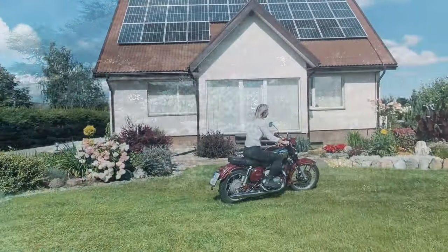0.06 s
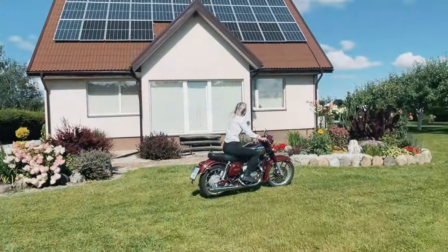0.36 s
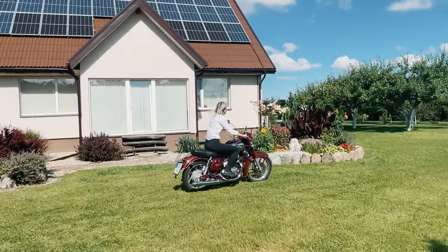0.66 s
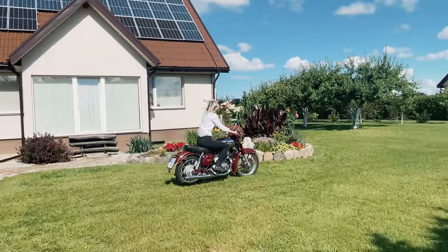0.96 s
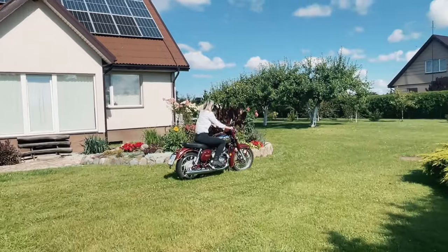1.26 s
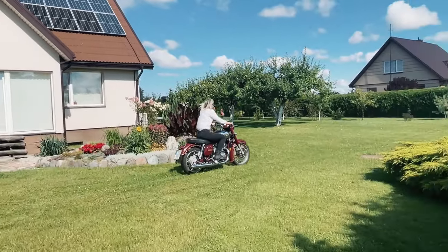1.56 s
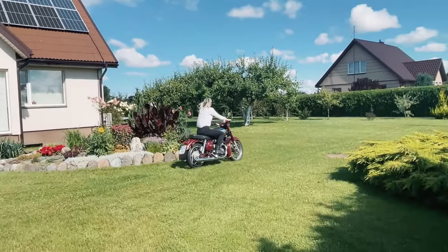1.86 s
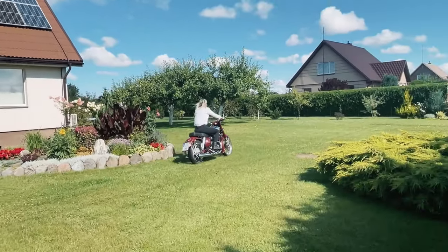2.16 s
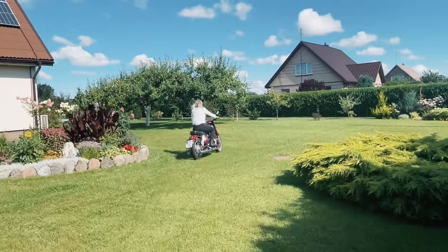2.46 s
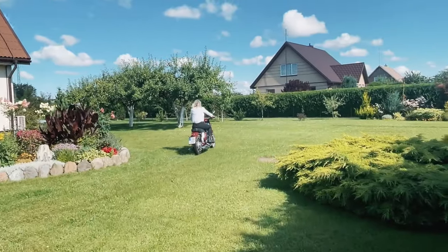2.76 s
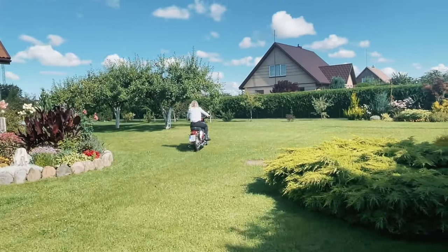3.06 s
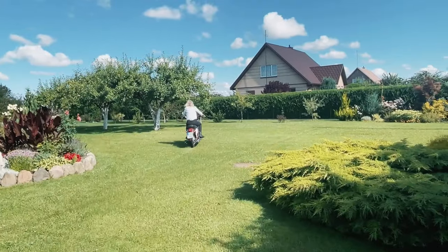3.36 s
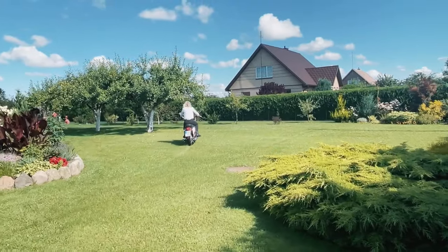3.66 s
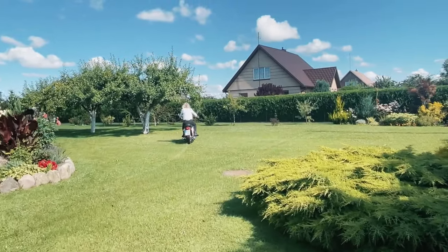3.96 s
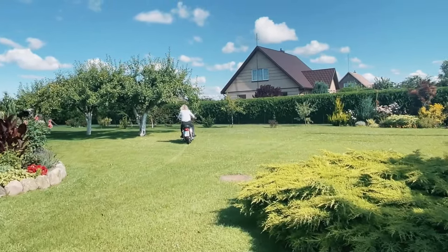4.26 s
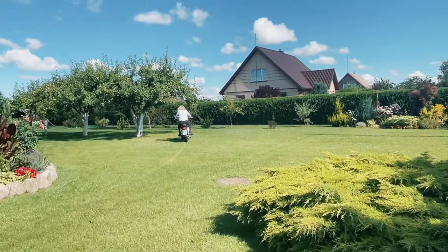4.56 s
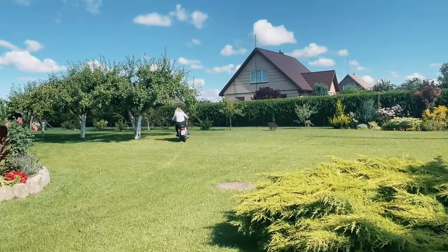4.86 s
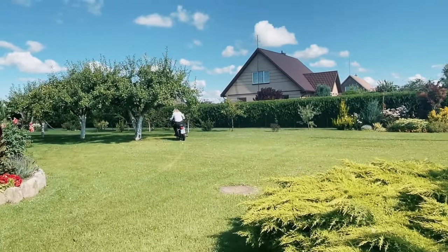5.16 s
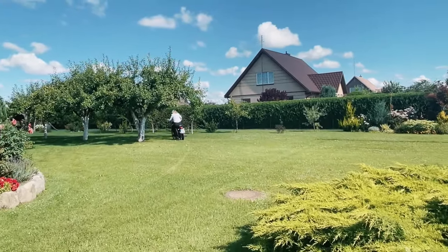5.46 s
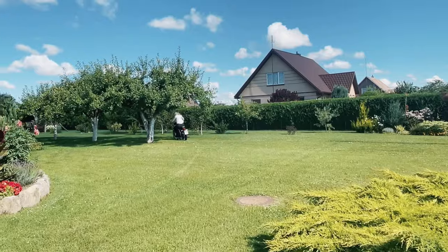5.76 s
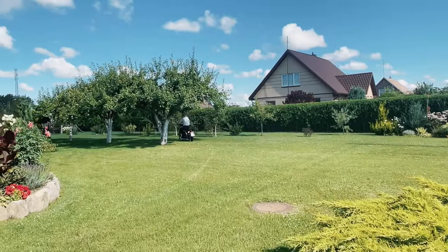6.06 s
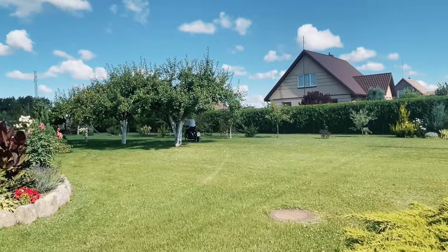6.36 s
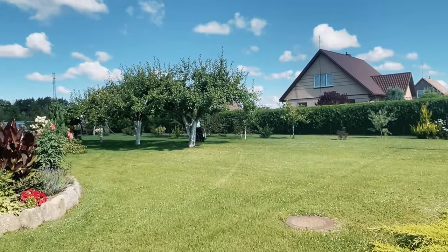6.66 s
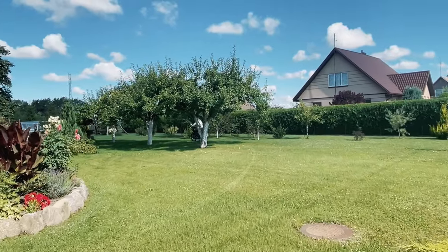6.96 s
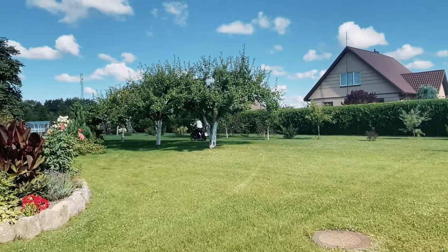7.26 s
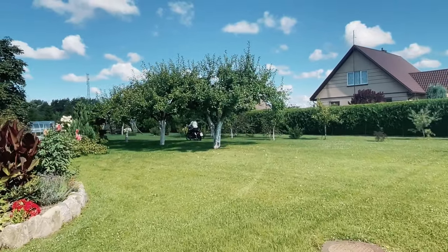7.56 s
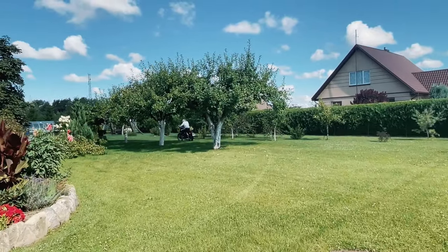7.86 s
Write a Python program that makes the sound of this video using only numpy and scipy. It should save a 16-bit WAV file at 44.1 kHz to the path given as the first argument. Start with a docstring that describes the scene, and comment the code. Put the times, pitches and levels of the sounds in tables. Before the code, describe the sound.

A single-cylinder motorcycle chugs across an open lawn at low revs, each beat a deep boom with a metallic rattle and a puff of hiss. It gently picks up pace as it moves away from the microphone and grows fainter. From about halfway, gusts of wind rumble and thump right on the microphone. Near the end the throttle shuts in the distance, and the gears whine faintly as the revs sink.

```python
"""A single-cylinder motorcycle chugs away from the microphone across a lawn, at low revs.
Every firing booms in the silencer, rattles the engine's metal and lets out a puff of gas.
Far off, near the end, the throttle shuts and the gears whine faintly as the revs sink.
As the bike recedes, gusts of wind buffet the microphone and single eddies thump it."""
import sys
import numpy as np
from scipy import signal
from scipy.fft import rfft, irfft
from scipy.io import wavfile
from scipy.ndimage import uniform_filter1d

SR = 44100
rng = np.random.default_rng(int(sys.argv[2]) if len(sys.argv) > 2 else 0)


def generate_wav(signal):
    """Clip the signal to [-1, 1] and save it as 16-bit WAV at the path in sys.argv[1]."""
    frames = np.transpose(np.atleast_2d(signal))
    scaled = np.clip(frames, -1, 1) * 32767
    pcm = np.round(scaled).astype(np.int16)
    wavfile.write(sys.argv[1], SR, pcm)


N = 348378
TIME = np.arange(N) / SR


# The engine's pace as the bike crosses the lawn: time_s, firing_hz
REVS = [(0.0, 16.17), (0.23, 17.0), (0.5, 17.28), (1.19, 19.23), (1.25, 19.95), (1.85, 21.6), (2.19, 23.63),
        (2.67, 24.09), (3.44, 22.59), (3.78, 21.58), (4.61, 22.65), (5.37, 23.13), (6.0, 25.52),
        (6.45, 24.88), (7.08, 27.24), (7.53, 17.43), (7.9, 17.96)]
# Engine noise from where the microphone stands: time_s, clatter_db, hiss_db
ENGINE_LEVELS = [(0, -33, -46), (.75, -30.5, -42), (1.5, -31.5, -43.5), (2.3, -32, -42.7),
                 (3.05, -33.5, -45.5), (3.22, -36.5, -50.5), (3.65, -36, -48), (4.5, -40.5, -50.5),
                 (5.1, -39, -51), (5.35, -36, -44.5), (5.75, -34.5, -41.5), (6.5, -35, -42.5),
                 (6.85, -40, -46.5), (7.35, -41, -48.5), (7.66, -48, -62), (7.85, -43.5, -52)]
def motorcycle():
    """The crank drives every engine sound, with one firing a turn."""
    firing_hz, = curves(REVS)
    turns = np.cumsum(firing_hz) / SR
    clatter_db, hiss_db = curves(ENGINE_LEVELS)
    return (exhaust(turns, firing_hz) + metal(turns, firing_hz, clatter_db)
            + gas(turns, hiss_db) + gears(turns, clatter_db))


# The silencer's tone, heard across the grass: frequency_hz, gain_db
SILENCER_SPECTRUM = [(18, -13), (34, -46.5), (43, 1.5), (53, -36.5), (68, 5.5), (85, 4), (108, 0.5),
                     (135, -7.5), (190, -11.5), (228, -32.5), (268, -20), (350, -38), (600, -64.5),
                     (1500, -100)]
# The boom at the microphone, fading with distance: time_s, level_db
BOOM_LEVELS = [(0, -9.5), (.9, -8.5), (1.8, -9.5), (2.1, -11.5), (2.5, -10), (2.85, -14), (3.8, -13),
               (4.9, -15), (5.15, -21.5), (5.5, -14.5), (5.9, -26), (7.9, -33.5)]
def exhaust(turns, firing_hz, idle_hz=15.99, heat=.34, wander=.016, scatter_db=.5, delay_s=.0017):
    """Each firing booms in the silencer; hotter gas at higher revs raises its pitch."""
    boom = -response(SILENCER_SPECTRUM)
    # the chambers hold back the low notes, so each boom sweeps downward
    boom = boom - 2 * resonate(boom, hz=105, width_hz=120)
    age, out = np.arange(len(boom)), np.zeros(N)
    for i in np.searchsorted(turns, np.arange(int(turns[-1]) + 1)):
        pitch_ratio = (firing_hz[i] / idle_hz) ** heat * (1 + wander * rng.standard_normal())
        stretched = np.interp(age * pitch_ratio, age, boom, right=0)
        add(out, i / SR + delay_s, stretched * undb(scatter_db * rng.standard_normal()))
    return steady(out, size=8000) * undb(curves(BOOM_LEVELS)[0])


# The tone of the engine's rattle in the open air: frequency_hz, gain_db
CLATTER_SPECTRUM = [(200, 1), (450, -9.5), (650, -9.5), (900, -7), (1150, -8), (1500, -0.5), (1950, -1.5),
                    (2600, 0), (3600, -0.5), (4300, -11), (5200, -11), (7000, -16), (12000, -34.5)]
# Weaker modes of the fins and covers: pitch_hz, width_hz, gain_db
FIN_MODES = [(1066, 50, 0), (1165, 33, 0.5), (1407, 12, 7), (2253, 16.4, 9.5), (2476, 200, -1),
             (2644, 21, 9), (3205, 49, 7), (3258, 66, 3.5), (3566, 110, -7.5), (3697, 45, -10),
             (4190, 53, 3.5)]
# Each ring of the case swells once, as its side turns to the microphone:
# pitch_hz, width_hz, turned_away_re_clatter_db, peak_s, half_length_s, swell_db, knock_gain
CASE_RINGS = [(801, 62, -19, 0.012, .4, 12, 0.18), (1114, 420, -19.5, 0.045, 1.55, 16.5, 0.27),
              (1322, 130, -11.5, 1.44, 0.75, 10, 0.58), (1565, 41, -19.5, 3.15, 3.2, 13.5, 0.34),
              (1700, 61, -17.5, 6.21, 0.88, 18.5, 0.92), (2782, 58, -13, 1.8, 0.9, 7, 0.42),
              (3904, 72, -14, 3.87, 0.87, 7.5, .3), (4110, 480, -19, 2.2, 0.23, 12, 0.26)]
def metal(turns, firing_hz, clatter_db, idle_hz=16):
    """Impacts clatter in the engine and ring its fins and case, pulsing more distinctly at low revs."""
    slack = (idle_hz / firing_hz) ** 4
    slap, fire = .82 * slack, .2 * slack
    rattle = impacts(turns, bed=.63, slap=slap, fire=fire, grain_db=1.2)
    out = undb(-.6) * unit(colour(rattle, CLATTER_SPECTRUM))
    fin_blows = impacts(turns, bed=.63, slap=slap, fire=fire, grain_db=.9)
    fins = sum(undb(db) * resonate(resonate(fin_blows, hz, width_hz), hz, 6 * width_hz)
               for hz, width_hz, db in FIN_MODES)
    out += undb(-6.5) * unit(fins)
    case_blows = impacts(turns, bed=.45, slap=slap, fire=.15, grain_db=.8)
    knock = piston_knock(turns)
    for hz, width_hz, db, peak_s, half_length_s, swell_db, knock_gain in CASE_RINGS:
        ring = resonate(resonate(case_blows + knock_gain * knock, hz, width_hz), hz, 3 * width_hz)
        facing = np.exp(-((TIME - peak_s) / half_length_s) ** 2)
        out += steady(ring, size=6000) * undb(db + swell_db * facing)
    return out * undb(clatter_db)


def impacts(turns, bed, slap, fire, grain_db):
    """Dense small impacts, strongest as the piston slaps over and as the charge fires."""
    slapping = burst(turns, at=.86, rise=.05, fall=.15, scatter_db=1.8)
    firing = burst(turns, at=.02, rise=.04, fall=.25, scatter_db=1.5)
    force = (bed + slap * slapping + fire * firing) * grains(grain_db, size=40)
    return steady(force * rng.standard_normal(N), size=8000)


def piston_knock(turns, at=.88, jitter_turns=.012, scatter_db=.9):
    """One firm knock of the piston in every turn."""
    count = int(turns[-1])
    timing, strength = rng.standard_normal((count, 2)).T
    hits = np.searchsorted(turns, np.arange(count) + at + jitter_turns * timing)
    out = np.zeros(N + 1)
    out[hits] = undb(scatter_db * strength)
    return unit(out[:N])


# The tailpipe's hiss as it reaches the microphone: frequency_hz, gain_db
HISS_SPECTRUM = [(2000, -23.5), (4500, 9.5), (6000, -0.5), (7200, 2), (8200, 0.5), (9300, 1.5), (10200, 7),
                 (11000, 3.5), (12000, -8), (13000, -49)]
def gas(turns, hiss_db, bed=.46):
    """A sharp puff of hiss as the exhaust port opens."""
    puff = bed + burst(turns, at=.025, rise=.035, fall=.1, scatter_db=2.5)
    return unit(colour(puff * rng.standard_normal(N), HISS_SPECTRUM)) * undb(hiss_db + .53)


def gears(turns, clatter_db, teeth=64, waver_hz=70, whine_db=-4, shut_s=7.3, closing_s=.1):
    """When the throttle shuts, the gears whine roughly at the tooth rate and its octave."""
    braking = np.clip((TIME - shut_s) / closing_s, 0, 1)
    out = np.zeros(N)
    for harmonic, db in ((1, -9), (2, -3)):
        waver = butter(rng.standard_normal(N) + 1j * rng.standard_normal(N), 2, waver_hz)
        tooth_tone = np.exp(2j * np.pi * teeth * harmonic * turns)
        out += undb(db) * unit(np.real(waver * tooth_tone))
    return out * undb(clatter_db + whine_db) * braking


# Single eddies right on the microphone: start_s, peak_db, upper_edge_hz
EDDIES = [(3.148, -7, 115), (3.325, -11.5, 354), (3.455, -11, 120), (4.204, -3.5, 109), (4.362, -31, 300),
          (4.398, -19, 397), (4.412, -1, 245), (4.563, -8, 337), (4.652, -2.5, 283), (4.8, -10, 197),
          (4.981, -5, 130), (5.661, -12.5, 376), (5.983, -14, 346), (6.286, -16, 420), (6.496, -13.5, 544),
          (6.599, -16, 400), (6.681, -3, 232), (6.81, -14, 484), (6.881, -6.5, 282), (6.913, -4, 640),
          (7.066, -8.5, 450), (7.096, -9, 616), (7.486, -4.5, 670), (7.665, -9, 465), (7.696, -11.5, 630),
          (7.716, -12, 427), (7.777, -17, 710), (7.811, -13, 398)]
def eddy_thumps(bass_cut_hz=68):
    """Each eddy is a rounded pressure step; the microphone's bass cut makes it swing and sink in pitch."""
    out = np.zeros(N)
    swing = butter(np.ones(6000), 5, bass_cut_hz, "high")
    for start_s, peak_db, upper_edge_hz in EDDIES:
        thump = butter(swing, 4, upper_edge_hz)
        add(out, start_s, -undb(peak_db) * thump / np.abs(thump).max())
    return out


# The breeze at the microphone between gusts: time_s, level_db
BREEZE_LEVELS = [(0, -23.5), (2.2, -26.5), (3.1, -20.5), (4.1, -26.5), (5.1, -27), (5.85, -26.5),
                 (6.3, -22.5), (7.9, -22.5)]
# Gusts off the lawn that hit the microphone: start_s, length_s, level_db
WIND_GUSTS = [(3.076, 0.36, -22), (4.14, 0.087, -19.5), (4.371, 0.035, -13), (4.578, 0.071, -14.5),
              (4.797, 0.17, -17), (5.406, .23, -20), (6.105, .06, -19), (6.29, 0.13, -19),
              (6.564, 0.33, -15.5), (6.975, .18, -14.5), (7.286, 0.026, -15), (7.363, 0.15, -16.5),
              (7.59, 0.19, -14)]
# The rumble of air on the microphone itself: frequency_hz, gain_db
BUFFET_SPECTRUM = [(18, -6), (32, -21), (45, -2.5), (70, 1.5), (105, -5.5), (150, -10), (220, -16),
                   (330, -23.5), (500, -33.5), (800, -50), (2000, -100)]
def wind(lumpy_db=5, attack_s=.043, release_s=.11):
    """Lumpy turbulence on the microphone; each gust rises out of the breeze, holds and drops back."""
    lumps = uniform_filter1d(grains(lumpy_db, size=300), 150)
    rumble = colour(lumps * rng.standard_normal(N), BUFFET_SPECTRUM)
    strength = undb(curves(BREEZE_LEVELS)[0])
    for start_s, length_s, level_db in WIND_GUSTS:
        corners = [start_s - attack_s, start_s, start_s + length_s, start_s + length_s + release_s]
        strength = np.maximum(strength, undb(level_db) * np.interp(TIME, corners, [0, 1, 1, 0]))
    return steady(rumble, size=2600) * strength


def burst(turns, at, rise, fall, scatter_db):
    """An envelope with one peak of random strength a turn; at, rise and fall are in turns."""
    since = (turns - at) % 1
    nearest_peak = np.round(turns - at).astype(int) + 2
    strength = undb(scatter_db * rng.standard_normal(400))[nearest_peak]
    return strength * (np.exp(-since / fall) + np.exp((since - 1) / rise))


def grains(scatter_db, size):
    """Random gains, each held for size samples."""
    return np.repeat(undb(scatter_db * rng.standard_normal(N // size + 1)), size)[:N]


def undb(db):
    """Decibels to gain."""
    return 10 ** (np.asarray(db) / 20)


def unit(x):
    """Scale to rms 1."""
    return x / np.sqrt(np.mean(x ** 2))


def curves(table):
    """Each column of a table, joined by straight lines in time."""
    time_s, *columns = np.transpose(table)
    return [np.interp(TIME, time_s, column) for column in columns]


def steady(x, size):
    """Hold the slow level at rms 1 and keep the fast detail."""
    return x / np.sqrt(uniform_filter1d(uniform_filter1d(x ** 2, size), size) + 1e-12)


def response(spectrum, size=16384):
    """Causal impulse response for rows of frequency_hz, gain_db."""
    hz, db = np.transpose(spectrum)
    grid_hz = np.maximum(np.arange(size // 2 + 1) * SR / size, 1)
    gain = undb(np.interp(np.log(grid_hz), np.log(hz), db))
    cepstrum = irfft(np.log(gain))
    cepstrum[1:size // 2] *= 2  # fold onto positive time for minimum phase
    cepstrum[size // 2 + 1:] = 0
    return irfft(np.exp(rfft(cepstrum)))


def colour(x, spectrum):
    """Pass a sound through a spectrum."""
    return signal.fftconvolve(x, response(spectrum))[:len(x)]


def resonate(x, hz, width_hz):
    """One resonance, gain 1 at its centre."""
    return signal.lfilter(*signal.iirpeak(hz, hz / width_hz, fs=SR), x)


def butter(x, order, hz, kind="low"):
    """A smooth low-pass or high-pass."""
    return signal.sosfilt(signal.butter(order, hz, kind, fs=SR, output="sos"), x)


def add(out, start_s, sound):
    """Mix a sound in at a time."""
    start = max(int(start_s * SR), 0)
    part = sound[:max(N - start, 0)]
    out[start:start + len(part)] += part


def scene():
    """One microphone on the lawn: the bike moving off, the wind right up close."""
    return (motorcycle() + wind() + eddy_thumps())[None]


def record(dry, top_hz=12900):
    """The recorder blocks steady pressure, rounds the highest peaks and cuts the top."""
    centred = butter(dry, 1, 3, "high")
    rounded = centred / (1 + centred ** 8) ** (1 / 8)
    return signal.sosfilt(signal.ellip(8, .2, 70, top_hz, fs=SR, output="sos"), rounded)


dry = scene()
out = record(dry)
generate_wav(out)
```